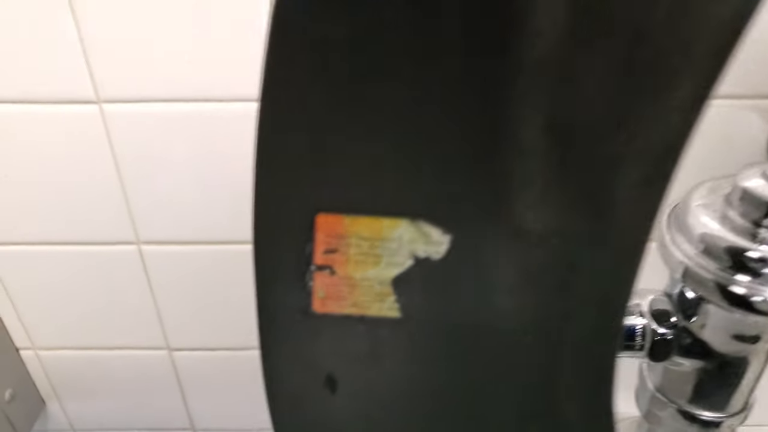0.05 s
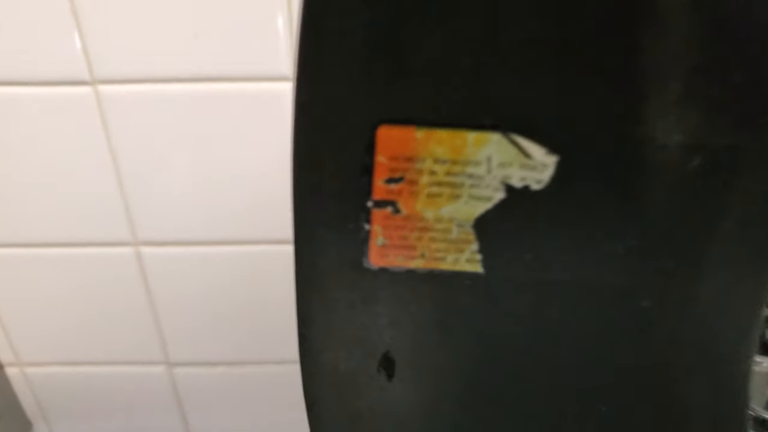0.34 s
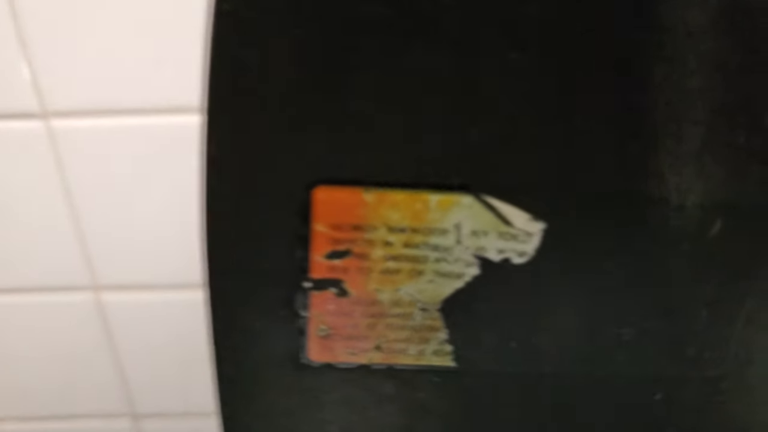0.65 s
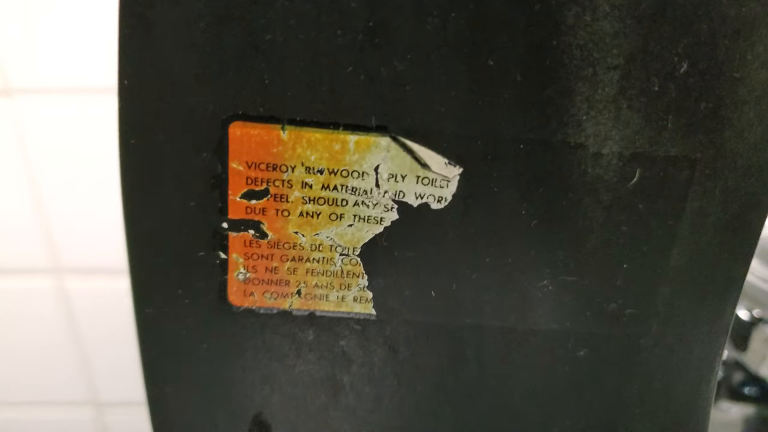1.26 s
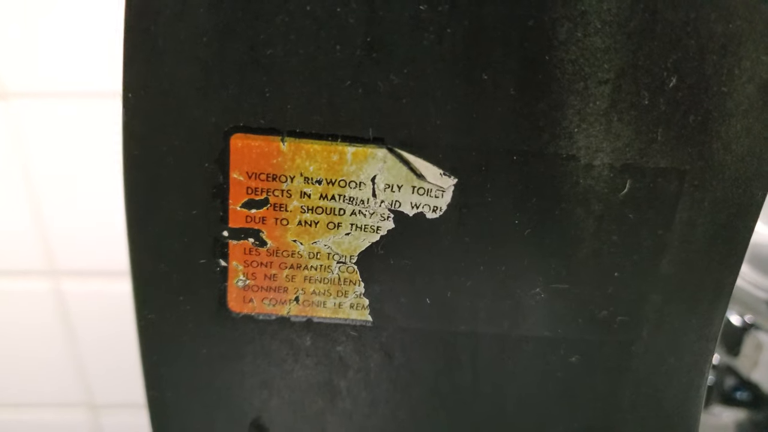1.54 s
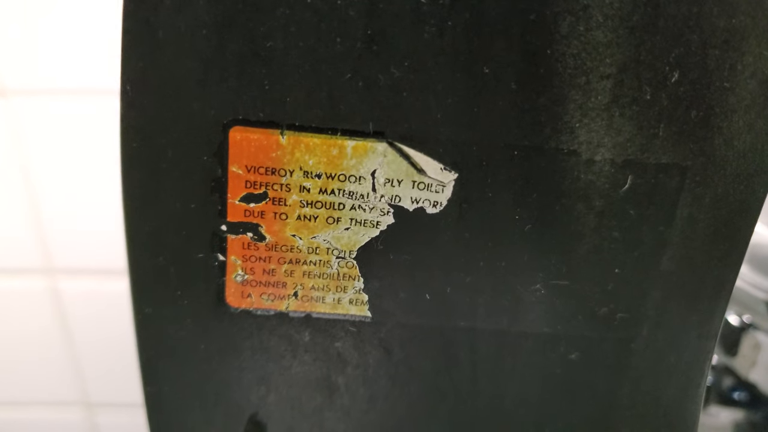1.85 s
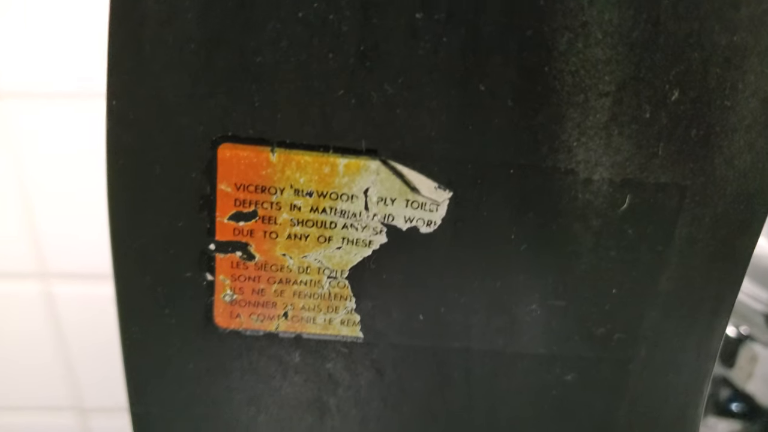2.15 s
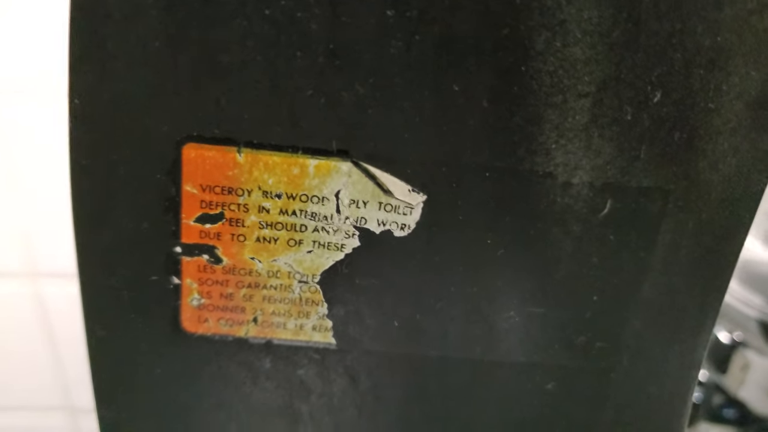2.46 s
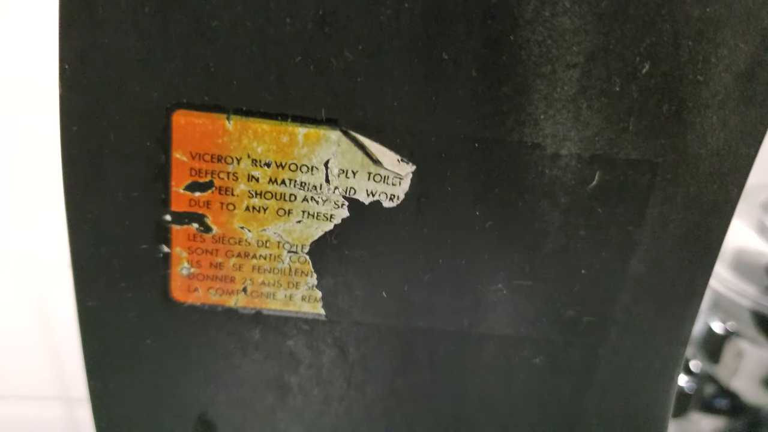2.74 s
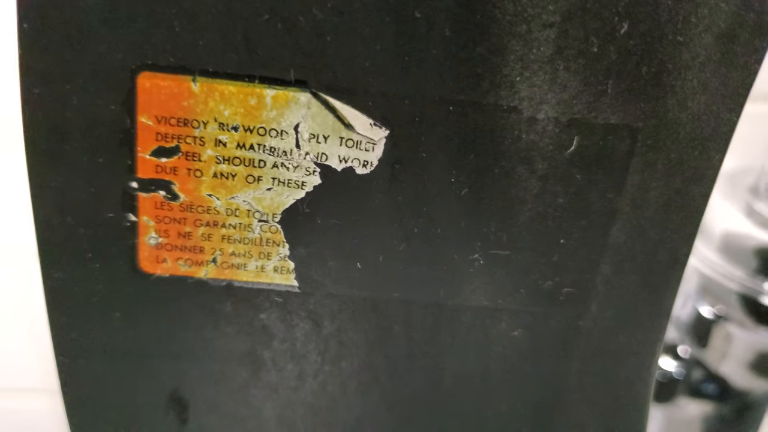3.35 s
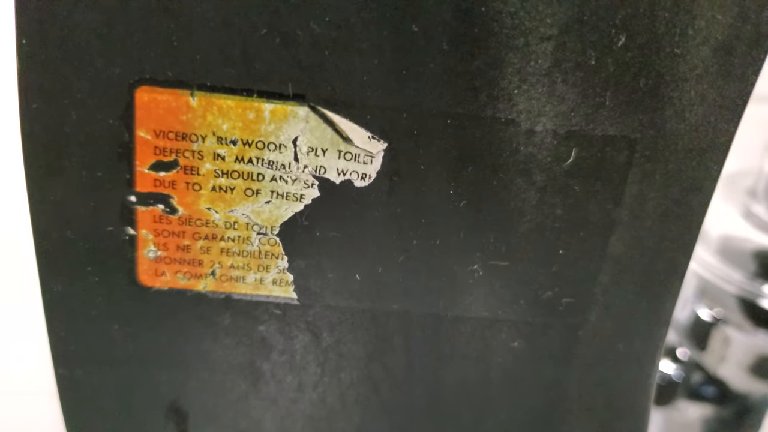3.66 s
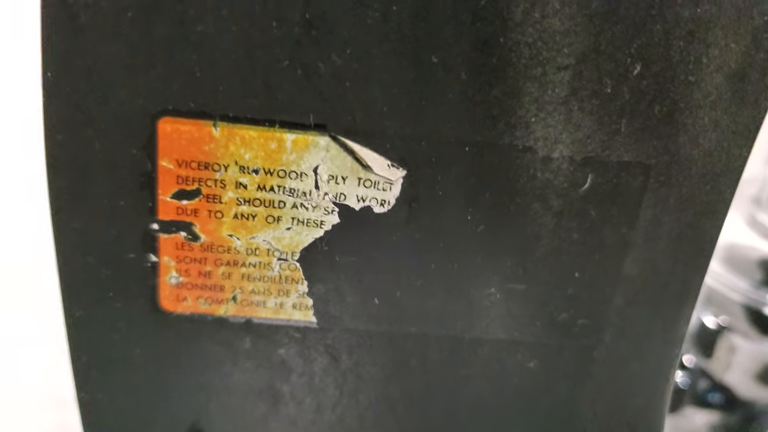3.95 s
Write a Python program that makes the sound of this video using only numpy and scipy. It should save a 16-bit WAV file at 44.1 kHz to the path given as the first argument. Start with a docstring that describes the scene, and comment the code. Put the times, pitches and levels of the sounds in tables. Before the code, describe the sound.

Close handling thumps and clicks on the microphone open over the soft, fading hiss of a flush valve. Faint drips follow, then a low ventilation hum remains, broken by one sharp knock that echoes briefly off the bathroom tiles.

```python
"""The hiss of flush water dies away in a small tiled bathroom, over a low ventilation hum.
The water rushes through a closing valve and sets the pipe singing; a few drips and swishes follow.
Close to the right microphone, fingers press the camera casing and let go in dull thumps and clicks.
Later the casing gives one sharp knock with a short rattle, and the tiles send back a brief echo."""
import sys
import numpy as np
from scipy import signal
from scipy.fft import rfft, irfft
from scipy.io import wavfile

SR = 44100
rng = np.random.default_rng(int(sys.argv[2]) if len(sys.argv) > 2 else 0)


def inscribe(sig):
    """Save sig as 16-bit PCM at rate SR to the path in sys.argv[1].

    A 1-D sig is mono; a 2-D sig holds one channel per row.
    Samples are clipped to [-1, 1] before scaling.
    """
    pcm = np.round(np.clip(np.atleast_2d(sig).T, -1, 1) * 32767)
    wavfile.write(sys.argv[1], SR, pcm.astype(np.int16))


N = 176400
TIME, FREQ = np.arange(N) / SR, np.fft.rfftfreq(N, 1 / SR)


def amp(db):
    """Decibels to gain."""
    return 10 ** (np.asarray(db) / 20)


def unit(x):
    """Scales to rms 1."""
    return x / np.sqrt(np.mean(x ** 2) + 1e-20)


def read(points, hz=FREQ, column=1):
    """Reads a table on a log-frequency axis."""
    table = np.transpose(points)
    return np.interp(np.log(hz + 1), np.log(table[0]), table[column])


def pan(db):
    """Left and right gains of constant power for a balance in dB, left minus right."""
    gains = np.array([amp(np.atleast_1d(db)), np.ones(np.size(db))])
    return gains / np.sqrt((gains ** 2).mean(0))


def noise(gain, likeness=0):
    """Stereo noise of rms 1 with a given spectral shape and left-right likeness."""
    left, other = rfft(rng.standard_normal((2, N)))
    likeness = np.clip(likeness, -1, 1)
    right = likeness * left + np.sqrt(1 - likeness ** 2) * other
    return unit(irfft(np.array([left, right]) * gain, N))


def band(hz, octaves):
    """A bell-shaped spectrum."""
    return np.exp(-.5 * (np.log2((FREQ + 1) / hz) / octaves) ** 2)


def drift(rate_hz):
    """A random curve of rms 1 that wanders up to about the given rate."""
    return unit(irfft(rfft(rng.standard_normal(N)) * np.exp(-(FREQ / rate_hz) ** 2), N))


def flutter(rate_hz, depth_db):
    """A randomly wandering gain."""
    return amp(depth_db * drift(rate_hz))


def burst(start, decay):
    """Instant attack, exponential decay."""
    return (TIME >= start) * np.exp(-abs(TIME - start) / decay)


def water():
    """Turbulent rush, fine spray and singing pipe die away as the valve shuts."""
    # Water running in the valve. Each row: time in seconds, rush level in dB, spray level in dB.
    flow = [(0, -58.5, -61.5), (.15, -57.5, -61.5), (.28, -56.5, -60), (.36, -64.5, -62.5),
            (.46, -68.5, -68.5), (.56, -76, -69.5), (.66, -74.5, -69), (.77, -82, -78.5),
            (.9, -81.5, -76.5), (1.3, -100, -100)]
    # Colours of the rush and the spray. Each row: frequency in Hz, relative level in dB.
    rush_colour = [(100, -3.5), (400, 4.5), (850, 1.5), (1200, -7.5), (2100, -2), (3000, -7), (4500, -5.5),
                   (7000, -20), (16000, -45)]
    spray_colour = [(1000, -13), (4000, -11), (6000, 2), (9300, -1), (12000, -2.5), (15500, -0.5)]
    # Pipe resonances. Each row: frequency in Hz, width in Hz, starting level in dB.
    pipe_modes = [(1491, 69, -66), (1587, 72, -65.5), (1700, 38, -70), (2330, 81, -71)]
    # Where the water sits between the microphones. Each row: frequency in Hz, balance in dB.
    balance = [(100, -10), (700, 0), (1300, -4), (2300, -7), (4400, -4), (8000, -3), (15000, 5)]
    fade_db_per_s2 = 192
    times, rush_db, spray_db = np.transpose(flow)
    sides = pan(read(balance))
    rush = noise(amp(read(rush_colour)) * sides) * amp(np.interp(TIME, times, rush_db))
    rush *= flutter(rate_hz=47, depth_db=0.7)
    spray = noise(amp(read(spray_colour)) * sides) * amp(np.interp(TIME, times, spray_db))
    spray *= flutter(rate_hz=340, depth_db=0.6)
    pipe = sum(amp(db) * noise(sides / (1 + (2 * (FREQ - hz) / width) ** 2))
               for hz, width, db in pipe_modes)
    return rush + spray + pipe * amp(-fade_db_per_s2 * TIME ** 2)


def ventilation():
    """Room tone: slowly swelling duct rumble, one wavering low hum and a steady wash of moving air."""
    # Colour of the moving air. Each row: frequency in Hz, relative level in dB.
    colour = [(20, -25), (35, -16.5), (55, 1), (80, -2.5), (105, -11), (135, -18), (170, -14.5), (195, -19),
              (220, -18), (300, -29.5), (400, -39.5), (600, -46), (1000, -54), (2500, -54), (5000, -60),
              (16000, -70)]
    # How alike the air is at the two microphones. Each row: frequency in Hz, correlation.
    likeness = [(30, 0.76), (130, 0.98), (290, 0.68), (640, 0.47), (1400, 0)]
    # Swell of the rumble and hum. Each row: time in seconds, gain in dB.
    swell_db = [(0, 1.5), (.65, 3), (1, -2), (1.7, -2.5), (2.2, 4), (2.7, -4), (4, 1.5)]
    hum_hz, wander_hz = 85.2, 3.047
    air = amp(-50.5) * noise(amp(read(colour)), read(likeness))
    rumble = irfft(rfft(air) / (1 + (FREQ / 250) ** 4), N)  # the air below 250 Hz
    wash = air - rumble
    cycles = np.cumsum(hum_hz + wander_hz * drift(rate_hz=8.1)) / SR
    hum = amp(-51.5) * unit(np.sin(2 * np.pi * cycles) * flutter(rate_hz=7.2, depth_db=3.5))
    swell = amp(np.interp(TIME, *np.transpose(swell_db))) * flutter(rate_hz=13, depth_db=1.5)
    return wash + (rumble + hum) * swell * pan(db=-1.44)


def finger_bumps():
    """Pressure builds on the casing by the right microphone and lets go: a thump with a short ring."""
    # Each row: release in seconds, strength of the push in dB, contact time in ms, balance in dB.
    touches = [(0.169, -23.5, 0.83, -38), (0.255, -18.5, 3.3, -3), (0.267, -21.5, 2.5, 8),
               (0.2754, -23, 0.85, -33), (0.3046, -16, 0.88, -37), (0.351, -31.5, 0.92, -18),
               (2.3267, -34, 0.3, -25), (2.329, -13, 0.92, -38), (2.3391, -19, 3.2, -35),
               (2.3456, -24.5, 0.32, -30), (2.3495, -27, 0.65, -30), (2.356, -24, 1.3, -31),
               (2.3840, -30.5, 1.1, -22), (2.4027, -17, 1.66, -32)]
    # Casing resonances. Each row: frequency in Hz, gain in dB, seconds to fall by 60 dB.
    case_modes = [(77.5, -28, 0.098), (382, -29, 0.06), (874, -29.5, 0.019)]
    release_share, low_cut_hz = 0.71, 124
    push = np.zeros((2, N))
    for release, db, contact_ms, pan_db in touches:
        progress = np.clip((TIME - release) * 1000 / contact_ms, -40, 40)
        push -= pan(pan_db) * amp(db) / (np.exp(-progress) + np.exp(2 * progress / release_share))
    thump = signal.sosfilt(signal.butter(2, low_cut_hz, "high", fs=SR, output="sos"), push)
    t = TIME[:SR // 2]
    ring = sum(amp(db - 60 * t / t60) * np.sin(2 * np.pi * hz * t) * 2 * np.pi * hz / SR
               for hz, db, t60 in case_modes)
    thump = thump + signal.fftconvolve(thump, ring[None], axes=1)[:, :N]
    return thump + amp(-25.5) * tile_echo(thump[1]) * pan(db=-18)


def casing_clicks():
    """The hard edge of a knock on plastic: a brief crunch, close on the right, with a duller echo."""
    # Each row: start in seconds, strength in dB, decay in seconds, treble tilt in dB per octave.
    knocks = [(0.1699, -15.5, .0012, -5), (0.2739, -13.5, 0.0013, -5), (0.3029, -12.5, 0.00091, -11.5),
              (2.3238, -24.5, .001, -2), (2.3280, -17.5, 0.00034, 0), (2.3441, -13.5, 0.0017, -5.5),
              (2.402, -28, .0015, -5.5)]
    # Colour of the plastic casing. Each row: frequency in Hz, gain in dB.
    colour = [(200, 8.5), (700, -2), (2000, -3), (4000, -10.5), (7500, -9.5), (10500, -4.5), (12500, -7),
              (16000, -21)]
    # The share that returns from the room. Each row: frequency in Hz, gain in dB.
    echo_share = [(300, -2.5), (2000, -7.5), (4000, -8.5), (7500, -5), (10000, -14.5), (15000, -9.5)]
    spectrum = 0
    for start, db, decay, tilt in knocks:
        crunch = rfft(burst(start, decay) * rng.standard_normal(N))
        flat_crunch = np.exp(1j * np.angle(crunch))  # same timing, level spectrum
        spectrum = spectrum + flat_crunch * amp(db + read(colour) + tilt * np.log2(FREQ / 1000 + .5))
    echo = tile_echo(irfft(spectrum * amp(read(echo_share)), N))
    return irfft(spectrum, N) * pan(db=-20) + echo


def tile_echo(x):
    """Reflections from the nearby tiles: sparse taps, each band dying at its own speed."""
    # The bathroom's decay. Each row: frequency in Hz, seconds to fall by 60 dB.
    decay_times = [(100, 1), (500, 0.53), (2000, 0.42), (8000, 0.64), (16000, 0.75)]
    taps_per_s, first_echo_s = 4000, .006
    taps = rng.standard_normal((2, SR)) * (rng.random((2, SR)) < taps_per_s / SR)
    taps *= TIME[:SR] > first_echo_s
    hz, t, bands = signal.stft(taps, SR, nperseg=256)
    fade = amp(-60 * t / read(decay_times, hz)[:, None])
    tail = signal.istft(bands * fade, SR, nperseg=256)[1]
    return signal.fftconvolve(x[None], tail / np.linalg.norm(tail[0]), axes=1)[:, :N]


def swishes():
    """Soft grainy swells after the main flow, mostly to the right."""
    # Each row: peak time, rise and fall in seconds, level in dB, centre in Hz, width in octaves,
    # balance in dB.
    swells = [(.39, .06, 0.039, -70, 2040, 0.25, -18), (.488, 0.0068, 0.011, -64.5, 450, .5, 4),
              (.515, 0.016, 0.027, -69.5, 2280, 0.7, -11), (.66, 0.03, 0.032, -78, 4900, 0.19, -8),
              (.682, 0.0053, 0.023, -67.5, 490, 0.46, -1), (.985, 0.038, 0.053, -71, 4140, 0.52, -6),
              (1.025, 0.041, 0.049, -72.5, 2350, 0.33, -11), (1.02, 0.065, 0.21, -81.5, 1170, 1.3, -1),
              (1.35, 0.12, 0.1, -85, 7500, .6, 3), (1.94, .07, 0.21, -82.5, 1270, 1.7, -2.5),
              (3.74, 0.056, .06, -87, 3380, .3, -3)]
    out = np.zeros((2, N))
    for peak, rise, fall, db, hz, octaves, pan_db in swells:
        swell = np.exp(-.5 * ((TIME - peak) / np.where(TIME < peak, rise, fall)) ** 2)
        out += amp(db) * swell * noise(band(hz, octaves)) * pan(pan_db)
    return out * flutter(rate_hz=310, depth_db=2.5)


def drips():
    """Small splats a little right of centre that echo off the tiles."""
    # Each row: start in seconds, level in dB, centre in Hz, width in octaves, decay in seconds.
    drops = [(0.484, -54.5, 1100, 1.1, 0.0049), (.634, -58, 5300, 0.67, 0.0045),
             (0.887, -62, 5400, 0.45, 0.0051), (.963, -54.5, 4600, 0.65, 0.004)]
    splats = sum(amp(db) * burst(start, decay) * noise(band(hz, octaves))
                 for start, db, hz, octaves, decay in drops)
    return (splats + amp(-1) * tile_echo(splats[0])) * pan(db=-4)


def scene():
    """Everything that reaches the camera's two microphones in the bathroom."""
    return water() + ventilation() + finger_bumps() + casing_clicks() + swishes() + drips()


def record(dry):
    """The right port notches the treble, both microphones add hiss, and the very top is cut off."""
    # Response of the right microphone's port. Each row: frequency in Hz, gain in dB.
    right_port = [(5400, 0), (6600, -7), (7600, -17), (8400, -1), (9300, 5), (11000, 0), (15000, 2.5)]
    # Colour of the microphone hiss. Each row: frequency in Hz, left and right relative levels in dB.
    hiss_colour = [(970, -7.5, -13), (5140, -24, -17), (5500, -6.5, -11.5), (6480, 0.5, -25),
                   (7380, -9.5, -15), (8120, -1.5, -16), (10240, -17.5, -18), (12800, -13, -14),
                   (15500, -12.5, -14)]
    hiss_db, top_hz = -81, 15850
    port_gain = amp(read(right_port, np.fft.rfftfreq(2 * N, 1 / SR)))
    right = irfft(rfft(dry[1], 2 * N) * port_gain)[:N]
    hiss = amp(hiss_db) * noise(amp([read(hiss_colour), read(hiss_colour, column=2)]))
    lowpass = signal.firwin(511, top_hz, window=("kaiser", 9), fs=SR)
    return signal.oaconvolve(np.array([dry[0], right]) + hiss, lowpass[None], "same")


dry = scene()
out = record(dry)
inscribe(out)
```